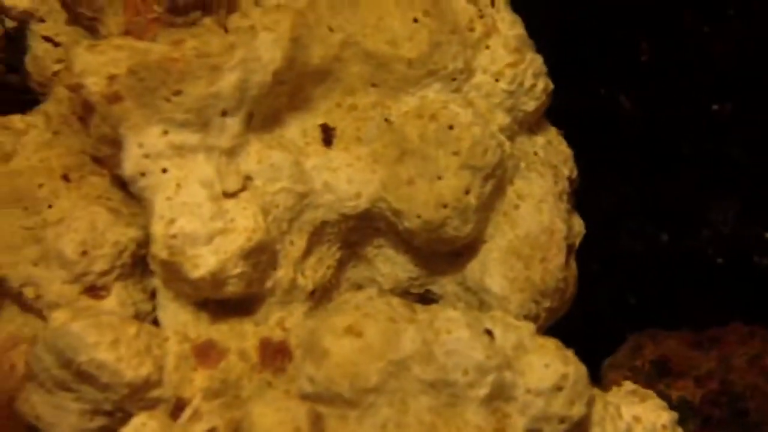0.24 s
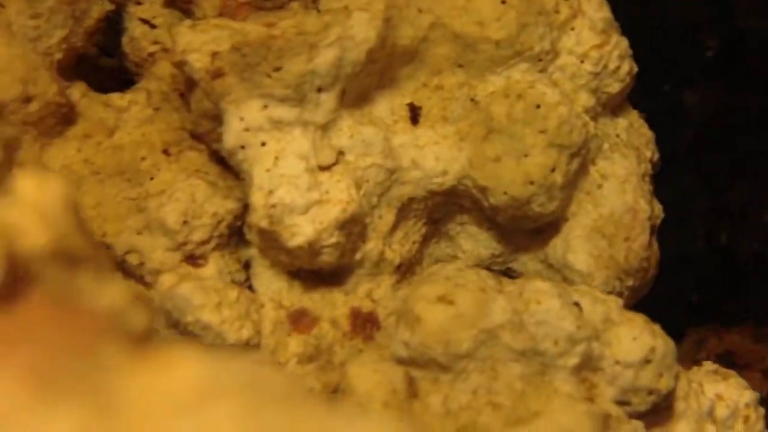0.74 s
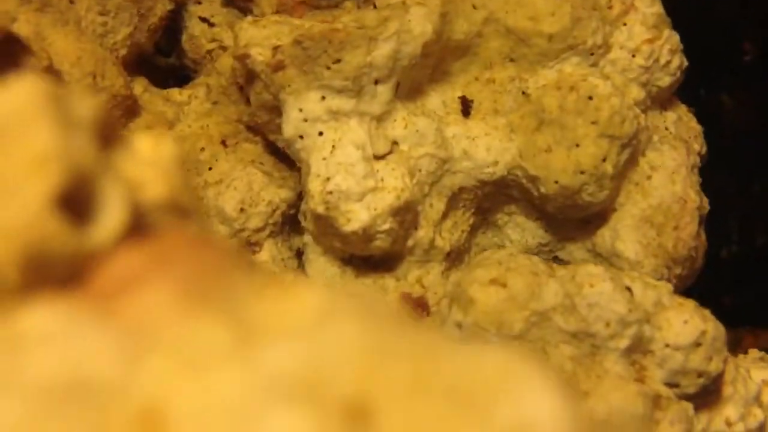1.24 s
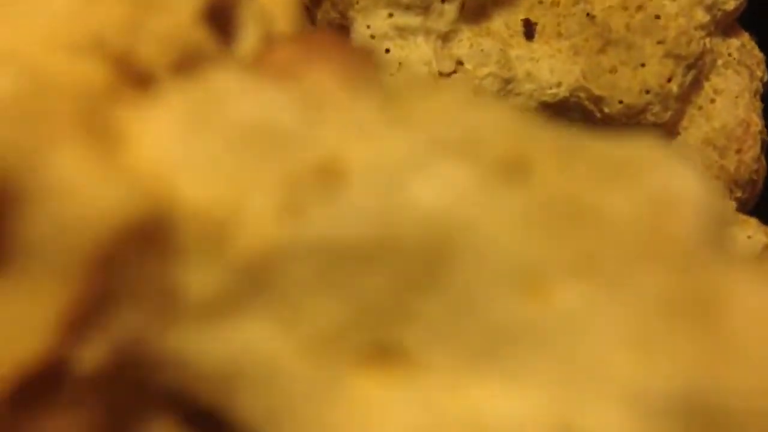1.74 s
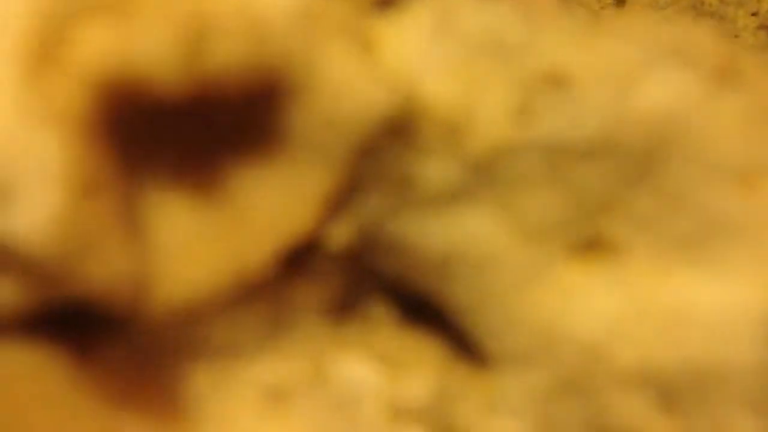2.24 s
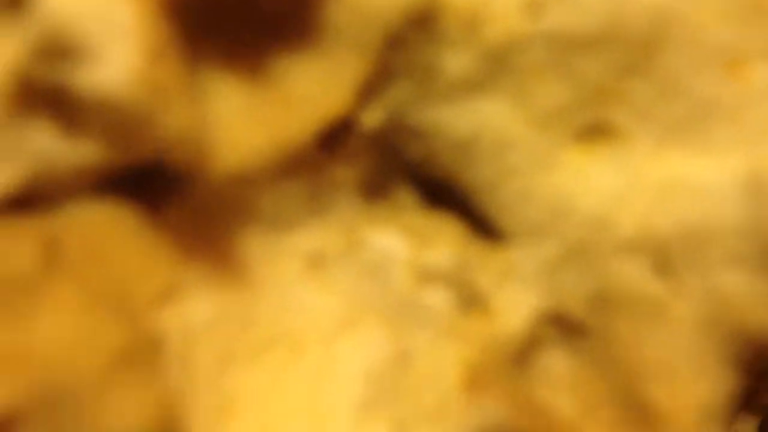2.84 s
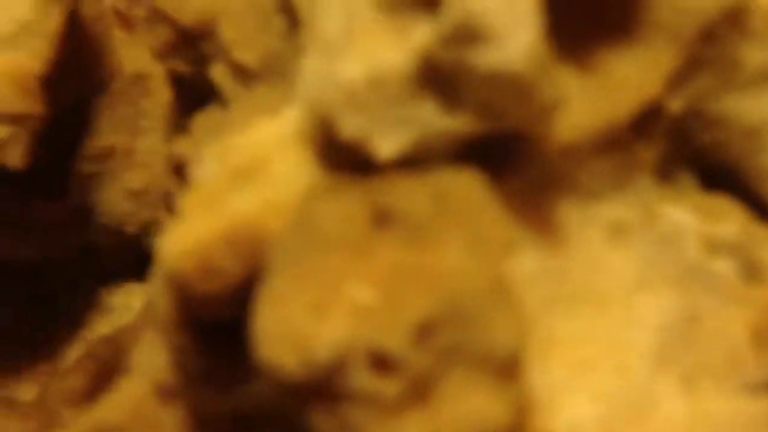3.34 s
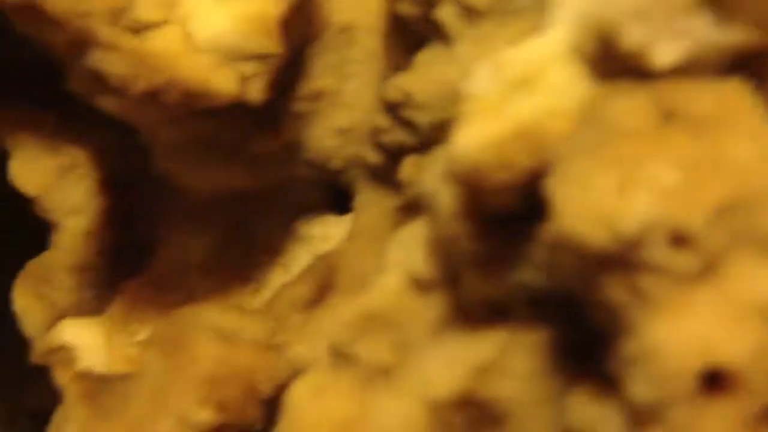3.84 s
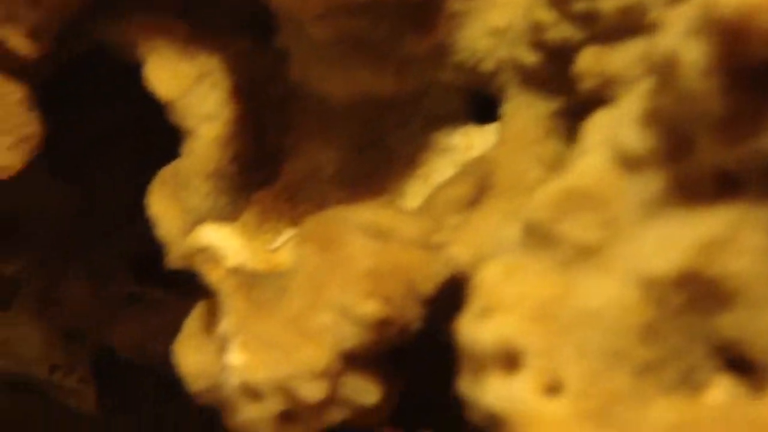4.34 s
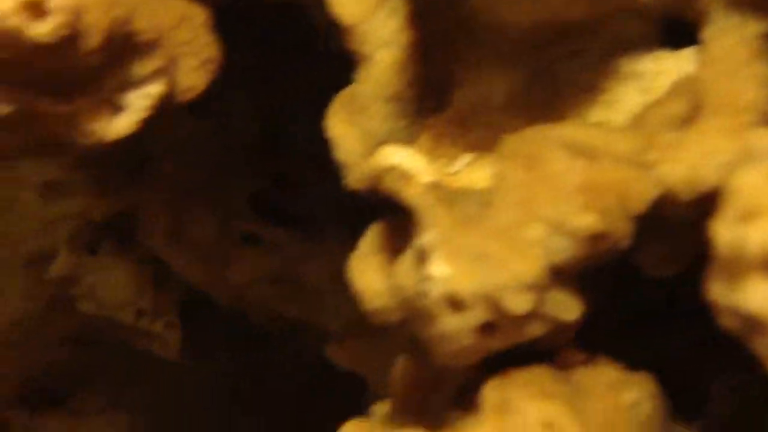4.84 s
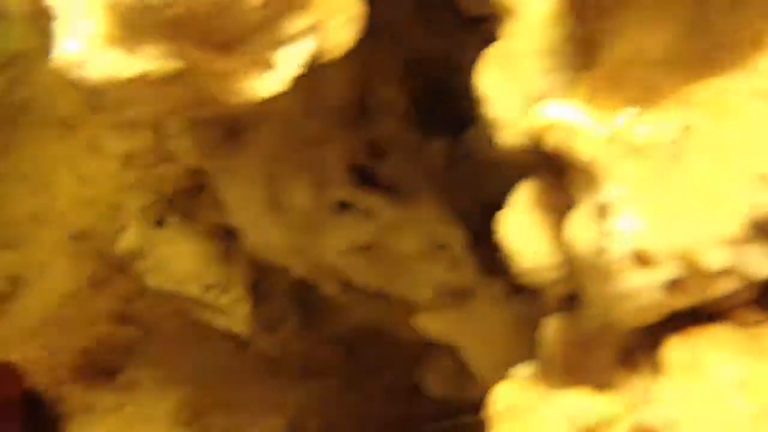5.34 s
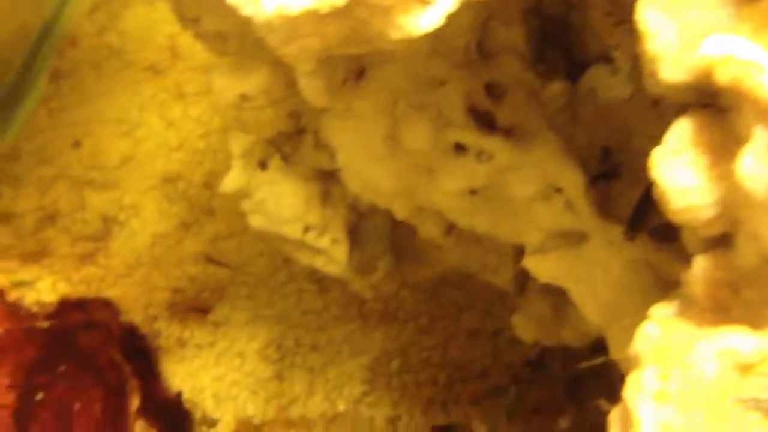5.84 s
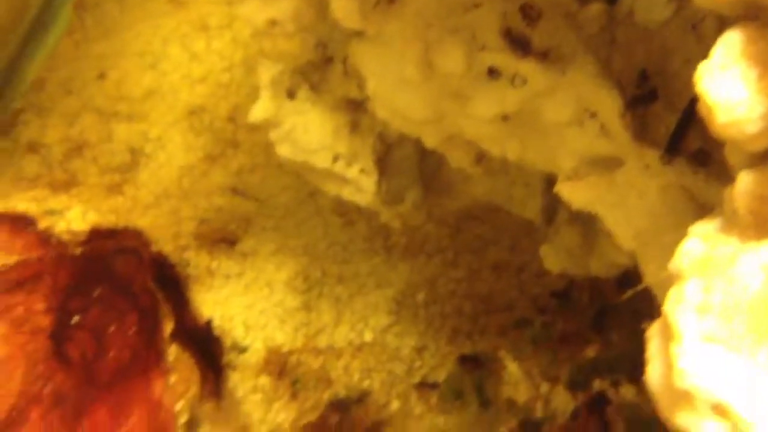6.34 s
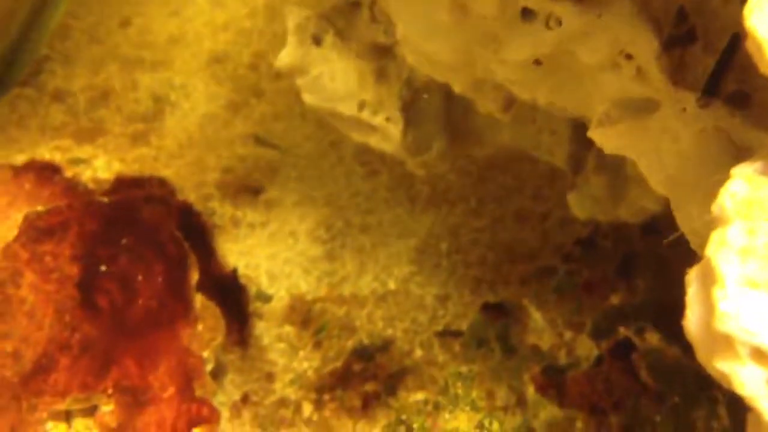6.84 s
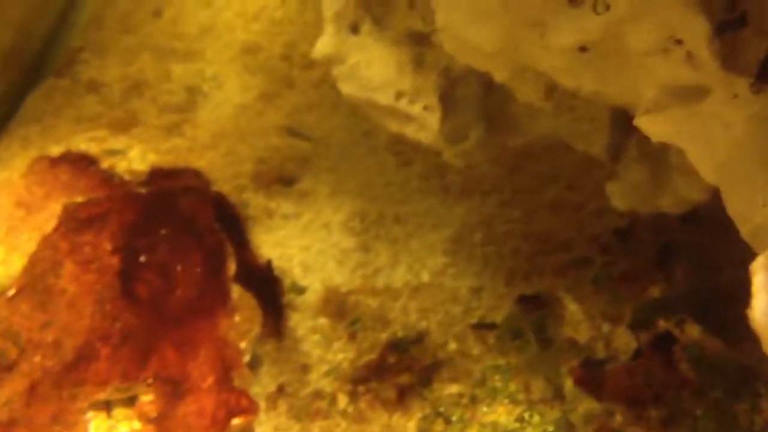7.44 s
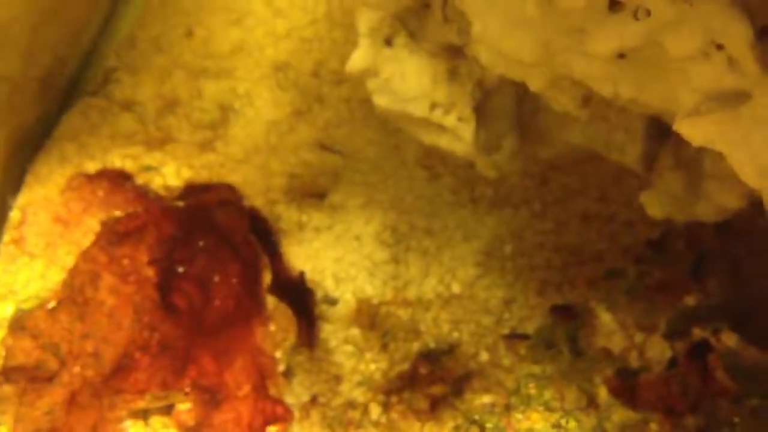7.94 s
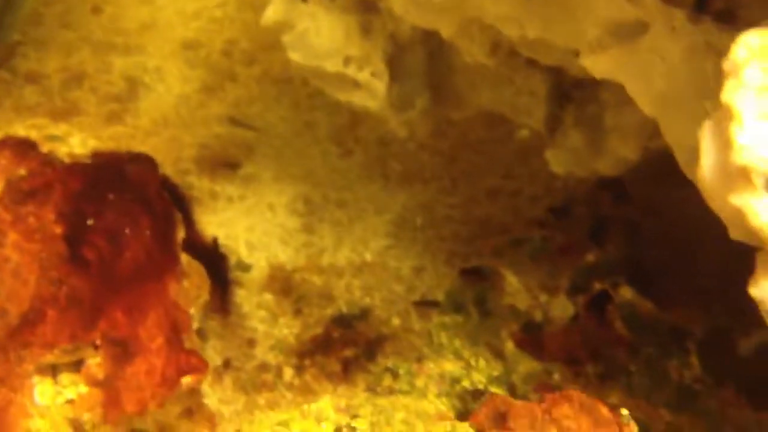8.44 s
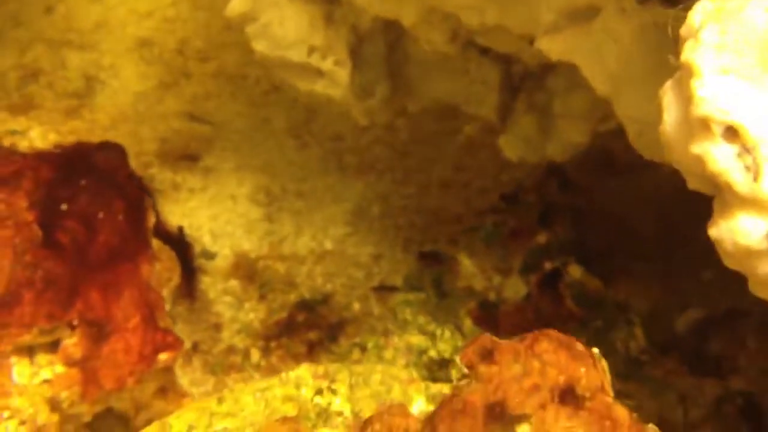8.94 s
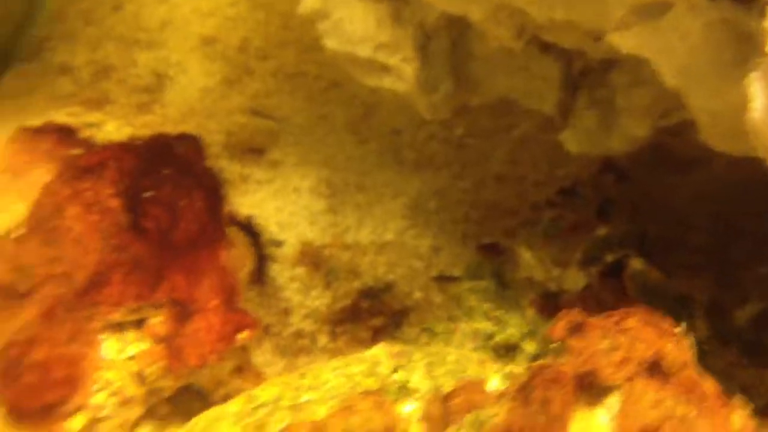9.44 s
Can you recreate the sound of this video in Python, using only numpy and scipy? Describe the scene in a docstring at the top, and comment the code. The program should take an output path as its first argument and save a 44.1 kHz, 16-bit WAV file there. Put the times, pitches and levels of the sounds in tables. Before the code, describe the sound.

A small aquarium pump hums and ticks rapidly behind porous rock, then churning water grows louder and ends in close, heavy gulping and splashing.

```python
"""Aquarium sump pump

A mains pump hums, its impeller ticks in the housing, and water churns, gulps and splashes in the tank.
Hum is a set of wavering sine waves; ticks are short bursts of noise coloured by the housing.
Water is filtered noise mixed with many ringing bubbles; gulps and plinks are single bubbles. A soft hiss stays.
The microphone starts behind porous rock, comes out over the open water and ends close to the inflow."""
import sys
import numpy as np
from scipy import signal
from scipy.fft import rfft, irfft, next_fast_len
from scipy.io import wavfile
from scipy.ndimage import map_coordinates

SR = 44100
rng = np.random.default_rng(int(sys.argv[2]) if len(sys.argv) > 2 else 0)


def master_out(mix):
    """Clip the mix to full scale and print it as 16-bit PCM to the path in sys.argv[1]."""
    frames = np.transpose(np.atleast_2d(mix))
    ceiling = np.clip(frames, -1, 1)
    pcm = np.round(ceiling * 32767).astype(np.int16)
    wavfile.write(sys.argv[1], SR, pcm)


N = 426888  # length in samples
MAINS_HZ = 59.99  # mains frequency, and turns of the impeller per second
TOP_HZ = 15330  # the recorder's band limit

# the microphone's way: t/s, place (0 behind the rock, 1 over open water, 2 at the inflow)
MIC_PATH = [(0, 0.026), (2.8, 0.2), (3.4, 0.25), (4.2, 0.5), (4.8, 0.8), (6, 0.93), (7.5, 0.92),
            (8.55, 1.08), (9, 1.82), (9.68, 2.06)]

# strong hum lines, which fade in and out as the microphone crosses their nodes: t/s, level/dB
SECOND_HARMONIC = [(0, -43), (2.5, -40.5), (4, -40), (5.6, -34.5), (7.5, -33.5), (9.1, -32.5),
                   (9.68, -36.5)]
FOURTH_HARMONIC = [(0, -58), (.6, -70), (1.05, -48.5), (1.6, -53), (2.4, -49), (4.4, -48), (4.9, -56.5),
                   (5.8, -40), (6.5, -43.5), (7.3, -38.5), (7.9, -39.5), (8.8, -55), (9.55, -33.5),
                   (9.68, -36)]
SIXTH_HARMONIC = [(0, -55), (2, -54.5), (4, -56), (5.3, -49.5), (7.4, -47.5), (8.5, -44), (8.85, -33),
                  (9.1, -31.5), (9.4, -26.5), (9.68, -25)]
TENTH_HARMONIC = [(0, -67), (4.5, -60.5), (6.4, -45), (7.7, -51), (8.5, -52), (8.88, -27.5), (9.1, -29.5),
                  (9.33, -23), (9.68, -43.5)]
# weaker hum lines: multiple of the mains, level behind the rock/dB, over open water/dB,
# at the inflow/dB, waver/dB
WEAK_HARMONICS = [(3, -54, -53, -49.5, 2), (5, -80, -44, -36, 0), (7, -66, -57.5, -44.5, 1.5),
                  (9, -62, -55, -49, 4)]

# contacts in one turn of the impeller: part of a turn, level/dB, range of strength/+-dB,
# scatter in time/s, tilt/dB per octave, echo decay/s
TURN_CONTACTS = [(.9, 0.5, 6.5, 0.00025, 3, 0.0013), (.16, -10, 6, .0009, 6, .001),
                 (.385, 4.5, 4.5, 0.00027, -.5, 0.0015), (.58, -1, 6, 0.0006, -5, 0.0017)]
# impeller chatter, before the housing colours it: t/s, level/dB
CHATTER_LEVEL = [(0, -55), (2.3, -50), (4.2, -47), (5.6, -48.5), (6.4, -47), (8.2, -48.5), (8.9, -46.5),
                 (9.68, -50.5)]
# the hardest impeller ticks: t/s, rough peak after the housing/dB
HARD_TICKS = [(0.1151, -44), (0.2159, -44.5), (.2985, -44.5), (0.4157, -44), (0.4484, -40.5), (0.5152, -43),
              (0.5482, -41), (.579, -48), (0.598, -42), (0.6484, -42), (1.032, -45.5), (1.058, -43.5),
              (1.066, -45.5), (1.132, -39), (1.249, -44), (1.274, -49), (1.299, -42.5), (1.3319, -41),
              (1.6983, -39.5), (1.8652, -42), (1.9824, -38), (2.015, -42), (2.1824, -39.5), (2.3817, -39),
              (2.599, -43.5), (2.932, -37), (3.149, -44), (3.7324, -42), (4.0741, -39.5), (4.365, -37),
              (4.3994, -37.5), (4.5154, -34.5), (4.5486, -41.5), (4.6153, -38), (4.7827, -38.5),
              (4.8487, -35.5), (4.9327, -35.5), (5.032, -35.5), (5.1505, -41), (5.2495, -37),
              (5.6493, -39.5), (5.8157, -39), (5.9825, -37.5), (6.2495, -37.5), (6.2991, -40),
              (6.3657, -41), (6.382, -43), (6.4153, -38.5), (6.4492, -35), (6.4827, -36), (6.549, -35.5),
              (6.5989, -41.5), (6.7665, -39.5), (6.932, -42), (7.1152, -38), (7.7318, -37.5),
              (7.7996, -39.5), (8.1818, -38), (8.2985, -35.5), (8.3489, -37.5), (8.515, -36),
              (8.7986, -34.5), (8.8488, -36), (8.8987, -39), (9.2658, -35.5), (9.3651, -37),
              (9.5073, -40.5), (9.5487, -45)]
# tilt of the hard ticks: behind the rock/dB per octave, over open water/dB per octave, at the inflow/dB per octave
HARD_TICK_TILT = [4, 4, 3]
# how the pump housing colours the ticks, screened by the rock and in the open: f/Hz, gain/dB
SCREENED_HOUSING = [(3300, -34), (3650, -16), (4200, -14), (4600, -4.5), (4930, 2.5), (5450, -8),
                    (5950, -1.5), (7200, -16.5), (7700, -14), (8350, -41), (8850, -15.5), (9250, -26),
                    (9600, -16.5), (10000, -22), (11000, -12.5), (11900, -27), (13000, -21), (15000, -19)]
OPEN_HOUSING = [(3300, -34), (3650, -9.5), (4150, -14), (4650, -2), (5000, 2.4), (5450, -9.5), (5900, -5.5),
                (7200, -14), (8400, -17), (9000, -12.5), (9550, -10), (10000, -15), (11200, -11),
                (11900, -34.5), (15000, -36.5)]

# steady churning of the water, before throb and gushes: t/s, level/dB
CHURN_LEVEL = [(0, -44), (1, -46.5), (3.3, -46.5), (4.1, -46.5), (5.1, -39.5), (5.9, -36.5), (7.4, -34),
               (8.35, -31), (8.68, -32.5), (8.83, -27.5), (9.1, -27), (9.24, -23), (9.32, -20.5),
               (9.42, -21.5), (9.5, -22.5), (9.56, -22), (9.68, -26)]
# tone of the churning from behind the rock, over open water and at the inflow: f/Hz, relative level/dB per Hz
CHURN_BEHIND_ROCK = [(25, -31), (55, -11.5), (95, -5), (135, 6), (180, 4.5), (260, -1.5), (320, -4.5),
                     (420, -3), (455, -0.5), (495, 6.5), (545, 3.5), (620, -2), (730, -24), (860, -19.5),
                     (1100, -53.5), (2500, -69.5)]
CHURN_OVER_WATER = [(25, -24.5), (85, -16.5), (150, -3.5), (185, -1.5), (212, 5), (265, -2.5), (295, -.5),
                    (335, -8.5), (390, -5.5), (440, -5), (490, -4), (610, .5), (660, 0), (735, -4),
                    (785, -14.5), (860, -20), (1100, -47), (2500, -73)]
CHURN_AT_INFLOW = [(25, -51), (85, -30.5), (160, -13.5), (250, -6), (360, -3.5), (470, -1.5), (520, -6),
                   (600, 2.5), (660, -7), (735, -4.5), (800, -19.5), (920, -39), (1200, -46), (3500, -70)]

# big air pockets bursting in the water: t/s, peak/dB, starting pitch f/Hz, time to swell/s
AIR_POCKETS = [(.535, -31.5, 277, 0.0065), (5.623, -38, 550, 0.0037), (5.809, -32, 637, .004),
               (6.021, -22, 270, .004), (6.111, -35, 627, .004), (6.348, -31, 600, .004),
               (6.657, -32, 655, 0.0045), (7.348, -31.5, 640, 0.0046), (7.725, -23, 600, 0.0033),
               (7.839, -24, 540, 0.0043), (7.995, -24.5, 540, 0.0037), (8.408, -19.5, 563, .007),
               (8.466, -23, 587, 0.0075), (8.733, -20, 622, 0.0064), (8.771, -20, 617, 0.0076),
               (8.835, -21.5, 616, 0.011), (8.887, -21, 623, 0.0066), (9.066, -15, 590, 0.0069),
               (9.139, -13.5, 574, 0.0066), (9.182, -13, 606, 0.0078), (9.264, -14, 674, 0.0054),
               (9.283, -14, 600, 0.0062), (9.31, -10.5, 610, 0.0058), (9.353, -6.5, 589, 0.0068),
               (9.391, -9, 586, 0.011), (9.41, -13.5, 644, .0075), (9.483, -13, 575, 0.0048),
               (9.511, -5.5, 497, 0.0019), (9.5216, -7, 569, .0095), (9.616, -15, 602, 0.0077),
               (9.657, -15.5, 563, 0.0072)]

# splashing of the surface, before the gulps add to it: t/s, level/dB
WASH_LEVEL = [(0, -78.5), (2.9, -74.5), (3.5, -74), (3.75, -66), (4, -66), (4.3, -69.5), (4.47, -62.5),
              (4.6, -61), (4.72, -57.5), (4.95, -58.5), (5.1, -56.5), (5.45, -57.5), (5.85, -56.5),
              (6.35, -54.5), (6.5, -52), (6.63, -50.5), (6.76, -56.5), (6.87, -51.5), (6.98, -58.5),
              (7.2, -52.5), (7.4, -55.5), (7.62, -54.5), (7.8, -49.5), (8.2, -50.5), (8.55, -54),
              (8.72, -49.5), (8.88, -49), (9.05, -50.5), (9.28, -47.5), (9.42, -48), (9.51, -46.5),
              (9.59, -53), (9.68, -46.5)]
# the pump drives the water in spurts: part of a turn, relative level/dB
PUMP_SPURTS = [(.04, -5), (.16, -4), (.4, -3.5), (.52, 0), (.67, -2.5), (.78, 3), (.86, 5.5), (.95, -1)]
# tone of the splashing surface, and of the spray at the inflow: f/Hz, relative level/dB per Hz
SURFACE_TONE = [(500, -22.5), (900, -1), (1080, 3), (1250, -2), (1480, -10.5), (1800, -20), (2200, -30),
                (2450, -23), (2800, -37), (4000, -47.5), (8000, -83.5)]
SPRAY_TONE = [(500, -27.5), (900, 0.5), (1200, 0.5), (1400, 2), (1680, -2.5), (1950, -13), (2200, -14),
              (2500, -12), (2680, -24.5), (3200, -22.5), (3500, -28.5), (4200, -30.5), (8000, -61.5)]

# small bubbles that plink at the surface: t/s, peak/dB, starting pitch f/Hz
SMALL_BUBBLES = [(3.99, -57, 1080), (4.415, -55, 1080), (5.5, -50, 1090), (5.615, -55, 1070),
                 (5.93, -52, 1470), (5.963, -45, 1100), (6.2, -39, 1074), (6.81, -45, 1085),
                 (6.862, -43, 1086), (7.125, -47.5, 1085), (7.488, -42, 1060), (7.595, -45, 1084),
                 (7.675, -46, 1090), (7.741, -43, 1062), (8.585, -50, 1090), (9.343, -31, 1060),
                 (9.465, -51, 2780)]


def hum():
    """Mains harmonics from the pump; each forms its own standing wave, so the mix changes from place to place."""
    out = amp(curve(SECOND_HARMONIC)) * mains_line(order=2, waver_db=0.88)
    out += amp(curve(FOURTH_HARMONIC)) * mains_line(order=4, waver_db=0.8)
    out += amp(curve(SIXTH_HARMONIC)) * mains_line(order=6, waver_db=0.95)
    out += amp(curve(TENTH_HARMONIC)) * mains_line(order=10, waver_db=2.0)
    for order, *levels_db, waver_db in WEAK_HARMONICS:
        out += by_place(levels_db) * mains_line(order, waver_db)
    return out


def mains_line(order, waver_db):
    """One harmonic, of rms 1 before the changing water load makes its level and phase waver."""
    phase = 2 * np.pi * (round(order) * MAINS_HZ * np.arange(N) / SR + rng.random())
    level = np.sqrt(2) * amp(waver_db * wobble(2.405))
    phase_waver = 0.21 * waver_db * wobble(2.836)
    return level * np.sin(phase + phase_waver)


def impeller():
    """The rotor touches the housing at set parts of each turn; chatter and hard ticks make the housing sound."""
    drive = chatter() + hard_ticks()
    screened = shares()[0]  # how much is heard from behind the rock
    return screened * colour(drive, SCREENED_HOUSING) + (1 - screened) * colour(drive, OPEN_HOUSING)


def chatter():
    """Repeated contacts in every turn, mostly light and a little uneven in time, over a faint swish."""
    turns = np.arange(int(N / SR * MAINS_HZ) + 1)
    knocks = np.zeros(N)
    for part, db, spread_db, jitter_s, tilt_db, decay_s in TURN_CONTACTS:
        strength = 2 * rng.random(len(turns)) ** 2.0 - 1  # most contacts are light
        force_db = spread_db * strength
        brightness_db = tilt_db + 0.51 * force_db  # harder = brighter
        waves = amp(db + force_db)[:, None] * contacts(brightness_db, decay_s, crack=1.8)
        starts = (turns + part) / MAINS_HZ + jitter_s * rng.standard_normal(len(turns))
        knocks += scatter(starts, waves)
    swish = amp(-12.5) * rng.standard_normal(N)
    load_db = 0.5 * wobble(9) + 0.6 * wobble(35)
    return (unit(knocks) + swish) * amp(curve(CHATTER_LEVEL) + load_db)


def hard_ticks():
    """The hardest single contacts, short and with a strong crack."""
    s, db = np.transpose(HARD_TICKS)
    tilt_db = np.array(HARD_TICK_TILT) @ shares()[:, (s * SR).astype(int)]
    force = amp(db + 22.5)  # dB of force above the peak that leaves the housing
    return scatter(s, force[:, None] * contacts(tilt_db, decay_s=0.00052, crack=3.2))


def contacts(brightness_db, decay_s, crack):
    """One row per tick: a sharp contact and fading echoes, tilted by brightness_db per octave, each with its own pitch."""
    size = 400
    t = np.arange(size) / SR
    draws = rng.standard_normal((len(brightness_db), size + 1))
    waves = draws[:, 1:] * np.exp(-t / decay_s)
    waves[:, 0] += crack
    waves = np.pad(waves, ((0, 0), (size // 10, size // 10)))
    waves = waves / np.linalg.norm(waves, axis=1, keepdims=True)
    hz = np.fft.rfftfreq(waves.shape[1], 1 / SR)
    octaves = np.log2(np.clip(hz, 4500, 10000) / 5500)
    # own pitch: centre 5300 Hz, scatter 0.2 octave, width 0.056 octave
    distance = np.log2((hz + 1) / 5300) - 0.2 * draws[:, :1]
    ring = np.exp(-(distance / 0.056) ** 2)
    ring_db = 5.5 * (ring - ring.mean(axis=0))  # the average tick keeps its tone
    return irfft(rfft(waves) * amp(brightness_db[:, None] * octaves + ring_db))


def churn():
    """Large bubbles in turbulent water, coloured by the tank's cavities; it throbs with the pump and gushes at gulps."""
    large_bubbles = swarm(count=2400, low_hz=151.5, high_hz=898, cycles=3.65, spread_db=2.0)
    flow = rng.standard_normal(N) + amp(-17.5) * large_bubbles
    heard = np.zeros(N)
    for share, tone in zip(shares(), (CHURN_BEHIND_ROCK, CHURN_OVER_WATER, CHURN_AT_INFLOW)):
        heard += np.sqrt(share) * unit(colour(flow, tone))
    surge_db = 0.2 * wobble(3) + 0.2 * wobble(14)
    turn = np.arange(N) / SR * MAINS_HZ
    depth = by_place([1, 0.25, 2.1])  # throb in +-dB at the three places
    throb = depth ** np.cos(2 * np.pi * (turn - 0.87))  # strongest at 0.87 of a turn
    gush = after_gulps(level_db=-15, swell_s=0.01)
    return np.hypot(amp(curve(CHURN_LEVEL) + surge_db), gush) * throb * heard


def gulps():
    """Large air pockets swell and break off within a few cycles, their pitch climbing slightly."""
    s, db, hz, swell_s = np.transpose(AIR_POCKETS)[:, :, None]
    t = np.arange(2400) / SR
    age = t / swell_s
    swell = age ** 1.5 * np.exp(1 - age ** 1.5)
    ring = np.sin(2 * np.pi * hz * t * (1 + 0.01 * age))
    return scatter(s[:, 0], amp(db) * swell * ring)


def after_gulps(level_db, swell_s):
    """The gain of water that each gulp sets moving: a quick swell to level_db against the gulp's peak, then a fade."""
    s, db = np.transpose(AIR_POCKETS)[:2]
    age = np.clip((np.arange(N) / SR - s[:, None]) / swell_s, 0, 20)
    return amp(db + level_db) @ (age * np.exp(1 - age))


def wash():
    """Splashing froth of small bubbles, in spurts with each turn; spray at the inflow is brighter and more even."""
    small_bubbles = swarm(count=3000, low_hz=831, high_hz=3390, cycles=5.4, spread_db=2.5)
    froth = rng.standard_normal(N) + amp(-13.5) * small_bubbles
    part, db = np.transpose(PUMP_SPURTS)
    spurts = amp(np.interp(np.arange(N) / SR * MAINS_HZ, part, db, period=1))
    surface = unit(colour(froth * spurts, SURFACE_TONE))
    spray = unit(colour(froth * spurts ** 0.38, SPRAY_TONE))
    close = shares()[2] ** 2
    heard = np.sqrt(1 - close) * surface + np.sqrt(close) * spray
    slosh_db = 0.4 * wobble(7) + 0.7 * wobble(40)
    splash = after_gulps(level_db=-48, swell_s=0.011)  # every gulp throws up spray
    return (amp(curve(WASH_LEVEL) + slosh_db) + splash) * heard


def swarm(count, low_hz, high_hz, cycles, spread_db):
    """Random bubbles of rms 1 with equal energy per Hz; a few are much stronger than the rest."""
    when, pitch, strength = rng.random((count, 3)).T
    hz = low_hz * (high_hz / low_hz) ** pitch
    sizes = hz * amp(-spread_db * np.log(1 - 0.99 * strength))
    rings = bubbles(hz, cycles, rise=0.09, onset_cycles=0.53, size=1500)
    return unit(scatter(when * N / SR, sizes[:, None] * rings))


def plinks():
    """Single small bubbles ring longer than those in the froth."""
    s, db, hz = np.transpose(SMALL_BUBBLES)
    rings = bubbles(hz, cycles=12, rise=0.013, onset_cycles=6.2, size=4000)
    return scatter(s, amp(db)[:, None] * rings)


def bubbles(hz, cycles, rise, onset_cycles, size):
    """One row per bubble: a damped ring of peak 1 whose pitch climbs as it nears the surface."""
    age = hz[:, None] * np.arange(size) / SR  # in cycles
    swell = (1 - np.exp(-(age / onset_cycles) ** 2)) * np.exp(-age / cycles)
    phase = age + rise * (age - cycles * (1 - np.exp(-age / cycles)))
    return swell / swell.max(axis=1, keepdims=True) * np.sin(2 * np.pi * phase)


def hiss():
    """The even hiss of the microphone: filtered noise at a steady level."""
    tone = [(100, 9.5), (2500, -3.5), (7000, 0.5), (9000, -5.0), (11800, -5.5), (12600, -4.5), (15000, -3.5)]
    return amp(-68.0) * unit(colour(rng.standard_normal(N), tone))


def shares():
    """How much of each of the three places the microphone hears; they sum to 1."""
    place = np.clip(curve(MIC_PATH), 0, 2)
    return np.array([np.maximum(1 - np.abs(place - k), 0) for k in range(3)])


def by_place(levels_db):
    """The gain along the microphone's way, from a level for each of the three places."""
    return amp(np.array(levels_db) @ shares())


def amp(db):
    """Decibels as a plain gain."""
    return 10 ** (np.asarray(db) / 20)


def unit(x):
    """x scaled to rms 1."""
    return x / np.sqrt(np.mean(x ** 2) + 1e-20)


def curve(rows):
    """(t/s, value) rows as one value per sample."""
    return np.interp(np.arange(N) / SR, *np.transpose(rows))


def wobble(rate):
    """A smooth random curve, with rate random points a second."""
    points = rng.standard_normal(int(N * rate / SR) + 4)
    return map_coordinates(points, [np.arange(N) * rate / SR])


def colour(x, points):
    """x through a filter with the gain of the (f/Hz, gain/dB) points; it never sounds ahead of its input."""
    size = 8192
    hz, db = np.transpose(points)
    log_hz = np.log(np.fft.rfftfreq(size, 1 / SR) + 1)
    gain = amp(np.interp(log_hz, np.log(hz), db))
    # fold the cepstrum (the spectrum of the log gain) to get the causal, minimum-phase filter
    cepstrum = irfft(np.log(gain))[:size // 2]
    cepstrum[1:] *= 2
    return signal.fftconvolve(x, irfft(np.exp(rfft(cepstrum, size))))[:N]


def scatter(starts, waves):
    """Sum the rows of waves, each beginning at its start in seconds."""
    index = np.round(np.abs(starts) * SR).astype(int)[:, None] + np.arange(waves.shape[1])
    return np.bincount(index.ravel(), waves.ravel(), N)[:N]


def scene():
    """Pump, water and hiss together, as one channel."""
    pump = hum() + impeller()
    water = churn() + gulps() + wash() + plinks()
    return (pump + water + hiss())[None]


def record(dry):
    """The recorder keeps nothing above its band limit."""
    m = next_fast_len(N + SR // 2)
    kept = np.fft.rfftfreq(m, 1 / SR) < TOP_HZ
    return irfft(rfft(dry, m) * kept, m)[..., :N]


dry = scene()
out = record(dry)
master_out(out)
```